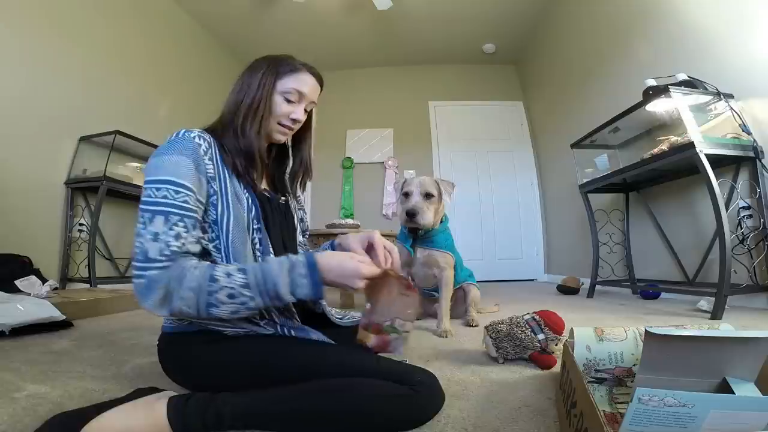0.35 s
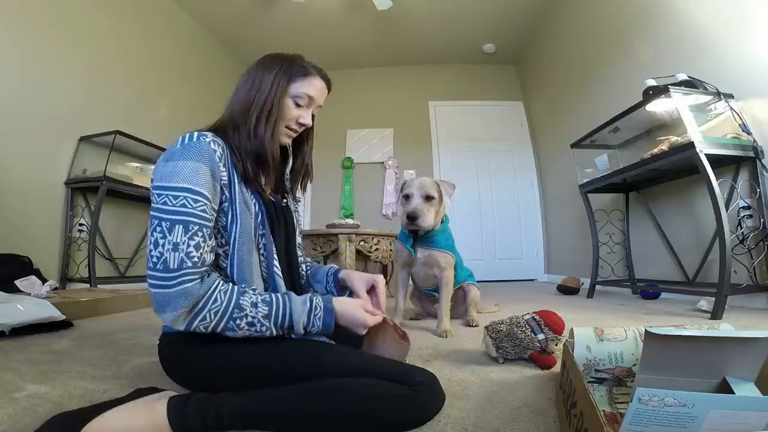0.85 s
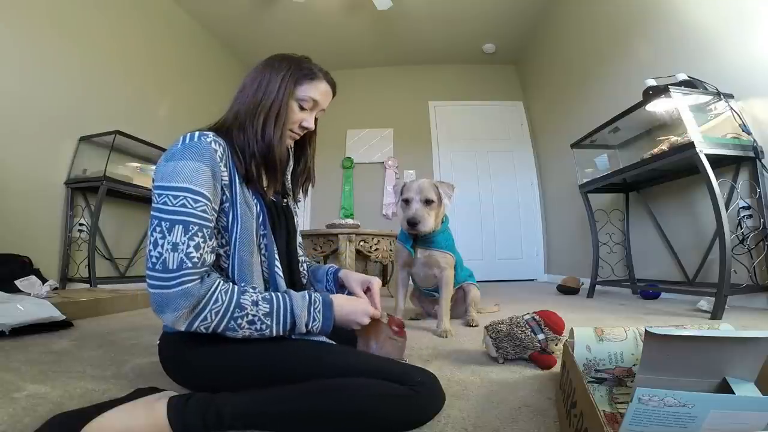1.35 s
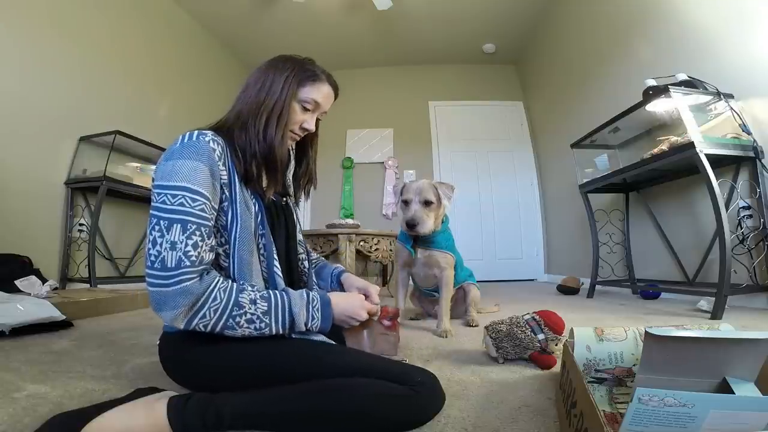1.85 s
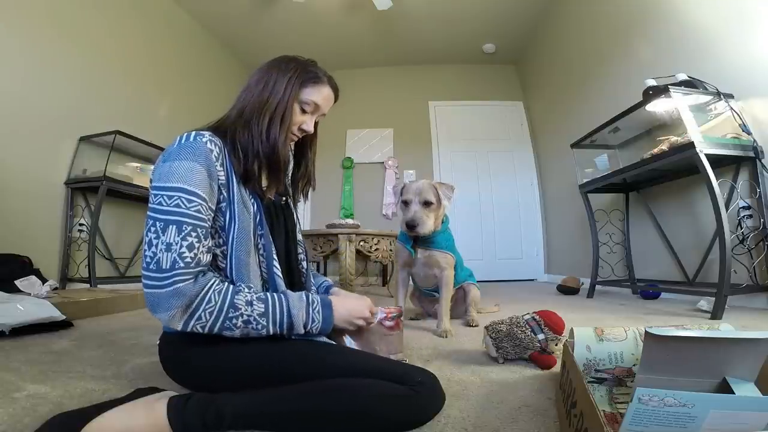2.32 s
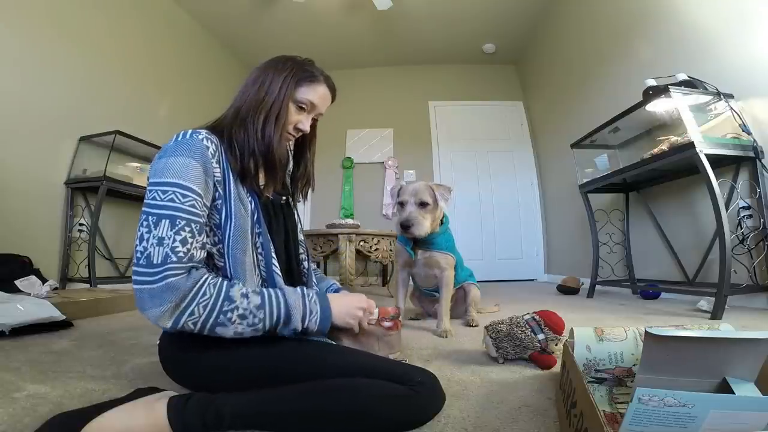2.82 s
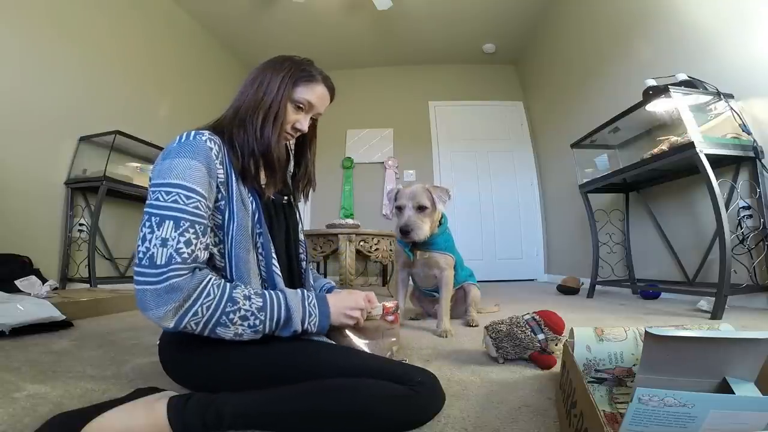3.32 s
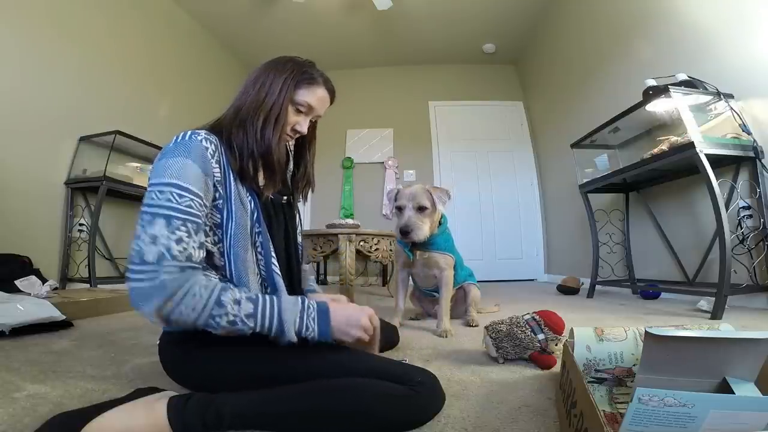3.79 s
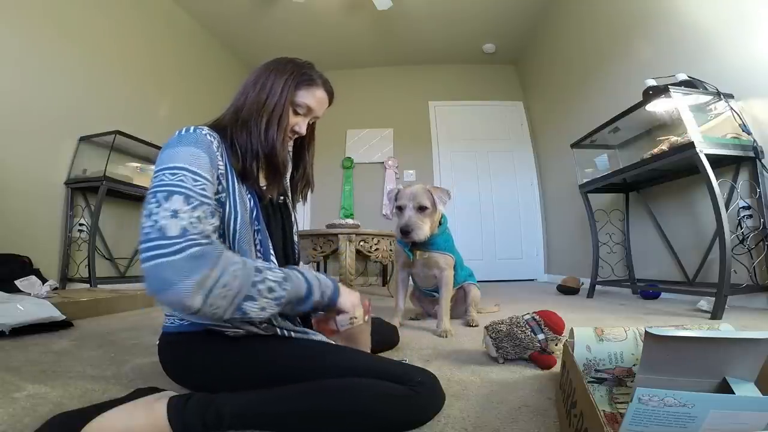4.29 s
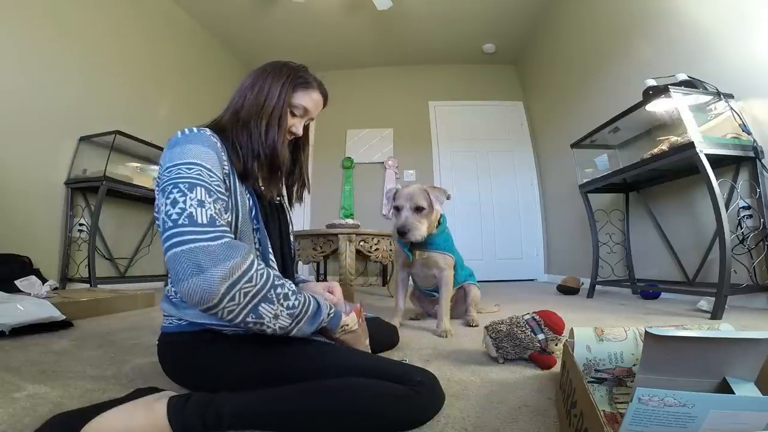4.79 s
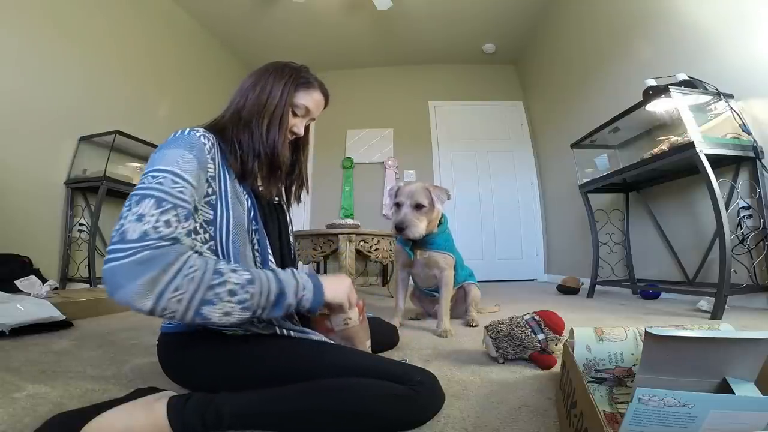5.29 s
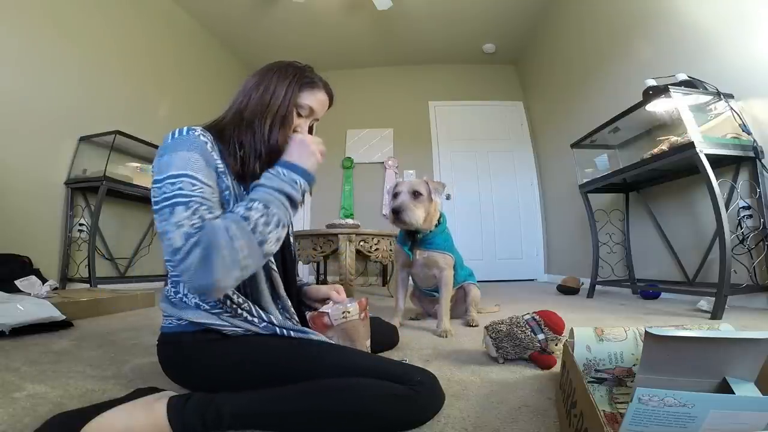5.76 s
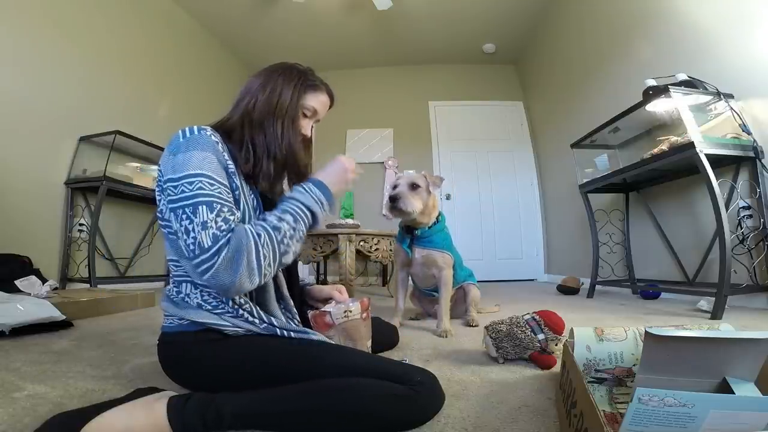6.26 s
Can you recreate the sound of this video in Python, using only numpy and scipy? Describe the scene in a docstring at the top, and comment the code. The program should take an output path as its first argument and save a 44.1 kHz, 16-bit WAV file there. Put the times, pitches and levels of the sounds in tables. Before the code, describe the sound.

Crackly plastic bag crinkling up close, sharp snaps and fine rustle in uneven flurries, over a faint low appliance hum indoors.

```python
"""A stiff plastic pouch is handled near the carpet of a small quiet room, an appliance humming faintly throughout.
Creases in the film snap over one by one, each with a pitch of its own, over a finer crackle: a quick burst
in the first 0.7 s, a lull, a few snaps around 1.5 s, then busier handling from 2.1 s. The densest, loudest
squeeze comes at 3.75 s and another flurry at 4.4 s; the snaps thin out and end near 6 s.
Panels and walls are decaying sines, the crackle rings random clicks; floor, walls and ceiling answer."""
import sys
import numpy as np
from scipy import signal
from scipy.fft import rfft, irfft
from scipy.io import wavfile

SR = 44100
rng = np.random.default_rng(int(sys.argv[2]) if len(sys.argv) > 2 else 0)


def voltage_ratio(level):
    """Linear amplitude factor for a level in decibels (scalar or array-like)."""
    return 10 ** (np.asarray(level, float) / 20)


def inscribe(sig):
    """Save sig as 16-bit PCM at rate SR to the path in sys.argv[1].

    A 1-D sig is mono; a 2-D sig holds one channel per row.
    Samples are clipped to [-1, 1] before scaling.
    """
    pcm = np.round(np.clip(np.atleast_2d(sig).T, -1, 1) * 32767)
    wavfile.write(sys.argv[1], SR, pcm.astype(np.int16))


N = 281446


def rms_one(x):
    """Scale to rms 1."""
    return x / np.sqrt(np.mean(x ** 2) + 1e-20)


def at_hz(points, hz, column=1):
    """Read a table on a log-frequency axis."""
    table = np.array(points)
    return np.interp(np.log(hz), np.log(table[:, 0]), table[:, column])


def filtered(x, hz, kind="low", order=2):
    """Butterworth filter: gentle roll-off beyond the corner frequency."""
    return signal.sosfilt(signal.butter(order, hz, kind, fs=SR, output="sos"), x)


# colour of the steady air and preamplifier noise: pitch_hz, relative level_db (per Hz)
ROOM_TONE = [(15, -27), (25, -4), (135, -8.5), (167, -14.5), (257, -15.5), (373, -26.5), (790, -22),
             (1210, -26), (2070, -29), (3180, -32.5), (15000, -44)]
ROOM_TONE_DB = -58  # rms


def room_tone():
    """Steady air and preamplifier noise: white noise coloured in the spectrum."""
    hz = np.maximum(np.fft.rfftfreq(N, 1 / SR), 1)
    spectrum = rfft(rng.standard_normal(N)) * voltage_ratio(at_hz(ROOM_TONE, hz))
    return voltage_ratio(ROOM_TONE_DB) * rms_one(irfft(spectrum, N))


# tones of the appliance: pitch_hz, level_db (rms, before the waver), waver_hz (new random values per second)
HUM = [(116, -59, 12), (85.8, -64.5, 6.5)]


def hum():
    """Low appliance tones whose strength and phase waver a little."""
    out, t = 0, np.arange(N) / SR
    for hz, level_db, waver_hz in HUM:
        steps = rng.standard_normal(200)
        waver = np.interp(t * waver_hz, np.arange(len(steps)), steps)
        tone = np.sin(2 * np.pi * hz * t + .7 * waver)
        out = out + np.sqrt(2) * voltage_ratio(level_db + .8 * waver) * tone
    return out


# squeezes of the fingers: start_s, hold_s (counted from the start), crackle_db (fine crackle),
# dull_db (tilt towards low pitches, per two octaves), rumble_db (bag walls)
SQUEEZES = [(0.0, 0.005, -51, 1, -60), (0.132, 0.033, -44.5, -6.5, -58), (0.242, .16, -52, -5, -57),
            (0.509, 0.082, -57, 8, -60), (0.598, 0.11, -56, -5.5, -68), (1.47, 0.059, -55, 1.5, -60),
            (1.618, 0.037, -48.5, -7.5, -51.5), (1.771, .03, -58, 10, -53), (2.084, 0.096, -49.5, -4, -59),
            (2.196, .05, -60, 12, -74), (2.307, 0.24, -56.5, 4, -58.5), (2.685, 0.054, -57, -2, -55),
            (2.793, 0.12, -53.5, 6.5, -59.5), (3.108, 0.059, -57, 11.5, -50.5),
            (3.207, 0.11, -56.5, 8.5, -56.5), (3.44, 0.034, -53, -2, -62), (3.625, 0.031, -48.5, -6, -76),
            (3.753, 0.094, -31, -7.5, -39.5), (3.96, 0.071, -44.5, 9.5, -56), (4.264, 0.081, -56.5, 1, -62),
            (4.318, 0.084, -47, -1, -49), (4.404, 0.043, -35.5, 0.5, -52), (4.445, 0.087, -46.5, 3, -44.5),
            (4.695, 0.083, -57, 5, -56.5), (4.86, 0.065, -54, 4, -59), (5.044, 0.061, -55.5, 1, -61),
            (5.117, 0.025, -45, -5, -52), (5.178, 0.045, -47, 1.5, -54), (5.265, 0.093, -59, 1, -60),
            (5.346, 0.037, -54.5, -3, -62), (5.407, 0.01, -51, 3.5, -51.5), (5.815, 0.018, -61.5, 11, -68)]
SQUEEZE_ATTACK_S, ATTACK_SHARE_OF_HOLD = 0.0031, 0.14  # long squeezes build slowly
SQUEEZE_RELEASE_DB_PER_S, RUMBLE_RELEASE_DB_PER_S = 159, 99
# the pouch merely held
HELD_CRACKLE_DB, HELD_DULL_DB, HELD_RUMBLE_DB = -70.5, 1.5, -66.5


def handling():
    """Squeezes swell, hold and let go; returns crackle dB, dullness dB and rumble dB in time."""
    t = np.arange(0, N + 64, 64) / SR
    start, hold, crackle_db, dull_db, rumble_db = np.array(SQUEEZES).T[:, :, None]
    swell = np.clip((t - start) / (SQUEEZE_ATTACK_S + ATTACK_SHARE_OF_HOLD * hold), 0, 1)
    after = np.maximum(t - start - hold, 0)
    # powers, so that overlapping squeezes add
    fine = (swell * voltage_ratio(crackle_db - SQUEEZE_RELEASE_DB_PER_S * after)) ** 2
    low = (swell * voltage_ratio(rumble_db - RUMBLE_RELEASE_DB_PER_S * after)) ** 2
    held = voltage_ratio(HELD_CRACKLE_DB) ** 2
    total = fine.sum(axis=0) + held
    # the strongest squeeze of the moment weighs most in the dullness
    dull = ((fine * dull_db).sum(axis=0) + held * HELD_DULL_DB) / total
    rumble = low.sum(axis=0) + voltage_ratio(HELD_RUMBLE_DB) ** 2
    curves = (10 * np.log10(total), dull, 10 * np.log10(rumble))
    return [np.interp(np.arange(N) / SR, t, curve) for curve in curves]


def ring(clicks, hz, t60):
    """A unit click sets a sine of height 1 ringing; it falls 60 dB in t60 seconds."""
    r, w = voltage_ratio(-60 / (t60 * SR)), 2 * np.pi * hz / SR
    return signal.lfilter([0, np.sin(w)], [1, -2 * r * np.cos(w), r * r], clicks + 1e-18)


def grains(per_s, spread_db, pitches, cycles):
    """Random clumped clicks, dealt to resonators; rms 1 each."""
    clumps = np.repeat(rng.standard_normal(N // 256 + 1), 256)[:N]
    born = rng.random(N) < per_s * voltage_ratio(4.0 * clumps) / SR
    sizes = voltage_ratio(spread_db * np.minimum(rng.exponential(1, N), 4)) * rng.choice([-1, 1], N)
    dealt = rng.integers(0, len(pitches), N)
    return [rms_one(ring(sizes * born * (dealt == k), hz, cycles / hz)) for k, hz in enumerate(pitches)]


# colour of the fine crackle of the film: pitch_hz, relative level_db
FILM = [(600, 8), (1000, -8.5), (1500, 3), (2400, -5), (4100, -4.5), (6000, -4), (9000, -34), (15000, -19)]
# typical rates, which the clumps raise and lower
CRACKLE_PER_S, CRACKLE_SPREAD_DB = 2200, 2.5
RUMBLE_PER_S, RUMBLE_HZ = 400, (235, 290, 345, 428, 580)


def crackle():
    """Small creases give way all the time; the large walls of the bag flex and rumble."""
    level_db, dull_db, rumble_db = handling()
    pitches, fine = np.geomspace(700, 14000, num=14), 0
    for hz, grain in zip(pitches, grains(CRACKLE_PER_S, CRACKLE_SPREAD_DB, pitches, cycles=5.0)):
        # a duller grip favours the large slow creases
        tilt_db = dull_db * np.log2(2500 / hz) / 2
        # the bands widen with pitch, and their level with them
        width_db = 10 * np.log10(hz / 1800)
        fine = fine + grain * voltage_ratio(at_hz(FILM, hz) + width_db + tilt_db)
    fine = filtered(fine, 600, "high")
    rumble = sum(grains(RUMBLE_PER_S, 2.2, RUMBLE_HZ, cycles=4.0))
    rumble = rms_one(filtered(rumble, 700))
    return rms_one(fine) * voltage_ratio(level_db) + rumble * voltage_ratio(rumble_db)


def flip(hz, cycles, t):
    """A sine that swells within half a turn and dies, losing 60 dB in the given cycles."""
    turns = hz * t
    swell = (1 - np.exp(-turns / .3)) ** 2
    return 2 * np.sin(2 * np.pi * turns) * swell * voltage_ratio(-60 * (turns - .5) / cycles)


# small creases that snap by chance; OVER is the peak above the crackle, give or take SPREAD
SMALL_SNAPS, SMALL_OVER_DB, SMALL_SPREAD_DB = 60, 9.5, 6
SMALL_HZ, SMALL_MOUTH_DB, SMALL_TICK_DB = (1900, 4500), -3, -10  # mouth and tick: middle of a 20 dB range


def small_snaps():
    """Rows like those of the louder creases, at random moments, as strong as the squeeze of the moment."""
    when, size, pitch, mouth, tick = rng.random((SMALL_SNAPS, 5)).T
    crackle_db = handling()[0][(when * N).astype(int)]
    peak_db = crackle_db + SMALL_OVER_DB + SMALL_SPREAD_DB * 2 * (size - .5)
    # squaring favours the low pitches
    hz = SMALL_HZ[0] * (SMALL_HZ[1] / SMALL_HZ[0]) ** (pitch ** 2)
    mouth_db = SMALL_MOUTH_DB + 20 * (mouth - .5)
    tick_db = SMALL_TICK_DB + 20 * (tick - .5)
    return np.transpose([when * N / SR, peak_db, hz, mouth_db, tick_db])


# the louder creases snapping over: start_s, level_db (panel peak, before the room), pitch_hz (panel),
# mouth_db (puff through the pouch mouth, relative to the panel), tick_db (relative to the panel)
SNAPS = [(0.075, -22, 3420, -18.5, -35), (0.131, -9.5, 5860, -17.5, 1.5), (0.1338, -17, 3740, -8.5, -12),
         (0.145, -31.5, 5140, -23, 15), (0.2507, -14.5, 2580, -9.5, -12), (0.3158, -8, 6240, -21, -2),
         (0.3467, -5.5, 4380, -33.5, 0.5), (0.5238, -46, 1920, -4, -17), (0.5319, -38.5, 3230, -1, -17),
         (0.5969, -40.5, 3180, 3, -10), (0.6202, -25, 4360, -18.5, -5), (0.6729, -28, 2680, -10.5, -34),
         (1.335, -42.5, 3640, -3, 0), (1.4112, -38, 5300, -24, -2), (1.4737, -20, 4000, -14.5, 1.5),
         (1.6246, -33.5, 2700, 3.5, -21), (1.6297, -18, 4100, -18, -0.5), (1.7729, -29.5, 2200, -0.5, -15),
         (1.787, -38.5, 2020, -3, -8), (2.0672, -29, 3620, -5, -25), (2.0802, -16.5, 5130, -13.5, -42),
         (2.1221, -47, 2450, -10, -19), (2.127, -23.5, 1970, -10, -2), (2.1314, -19.5, 4500, -9, -16),
         (2.1555, -13, 5200, -15.5, -2.5), (2.1635, -25.5, 3680, -7, 3), (2.2144, -40.5, 1910, 5.5, -10),
         (2.2497, -31.5, 2150, -12, -23), (2.2837, -38, 1890, -8, -17), (2.3307, -37.5, 4340, 0, -14),
         (2.3567, -30, 2120, -9.5, -14), (2.3988, -33, 6160, -8, -18), (2.4104, -32.5, 2750, -3, -4),
         (2.45, -28.5, 2570, -8, -10), (2.4629, -37, 1913, -4, -3), (2.5114, -29, 3500, -2.5, -25),
         (2.5165, -27, 2650, -20, -13), (2.54, -27, 4140, -28, -5), (2.7055, -24, 6030, -14.5, -28),
         (2.7305, -31, 1890, -6, -9), (2.74, -30.5, 3510, -20, -4), (2.8128, -28, 2030, 0.5, 0),
         (2.8391, -38, 1910, 4.5, -22), (2.856, -21.5, 5040, -12, -10), (2.8651, -27, 1980, -3.5, -13),
         (2.961, -40.5, 2100, -14, -1), (3.042, -45.5, 2100, 5, -1), (3.1245, -38.5, 2100, 4, -9),
         (3.1457, -31, 3500, 0.5, -2), (3.2119, -15.5, 4310, -13.5, -4.5), (3.2395, -25.5, 2410, -9, 1.5),
         (3.3295, -22, 1910, -8, 0), (3.361, -11.5, 4940, -17, -0.5), (3.3766, -27.5, 7900, -11, 8.5),
         (3.3897, -22.5, 1930, -35, 2), (3.452, -27.5, 2580, -3.5, -8), (3.6245, -19, 2206, -8.5, -5),
         (3.675, -25.5, 1840, -13, -1.5), (3.7572, -11.5, 4260, -25, -35), (3.7721, -9.5, 4330, -10, -1),
         (3.7816, -6.5, 3900, -18, -11), (3.7937, -8, 1910, -25, -5), (3.8034, -20, 2180, -2, 1),
         (3.8052, -7.5, 3260, -3, -1), (3.8243, -15.5, 2200, -19, -12), (3.8315, -17.5, 1970, 8.5, -26),
         (3.845, -6.5, 1910, -25, -6), (3.8576, -20.5, 2000, 5.5, 1), (3.8602, -8.5, 4000, -17, -0.5),
         (3.8872, -20, 3040, -1, -10), (3.9252, -35, 1920, 8, -22), (3.9641, -35.5, 2000, 7.5, -15),
         (3.9822, -26.5, 2090, -13, -14), (3.9977, -34, 1990, 3, -6), (4.0039, -19.5, 2860, 0, -7),
         (4.048, -27, 3920, -14, -29), (4.3197, -33, 2910, 2.5, -5), (4.3479, -28, 2612, -3, -2),
         (4.4148, -24.5, 2563, 3, -20), (4.4168, -30.5, 2870, -4.5, -18), (4.4355, -13.5, 2580, -6, -14),
         (4.448, -13.5, 2470, -29, -3.5), (4.475, -32, 2620, -15, -13), (4.4911, -38, 3040, -12, -25),
         (4.5155, -33, 3860, -7, -22), (4.5234, -23.5, 2850, -15, -23), (4.5408, -28.5, 1900, -5, -18),
         (4.5544, -27.5, 2000, -3.5, -27), (4.624, -38, 2630, -15, -20), (4.715, -46.5, 4640, 9, -28),
         (4.7421, -25, 3600, -7, -35), (4.8425, -49.5, 1890, 2, -18), (4.8531, -42, 2970, -10, -20),
         (4.8783, -33, 2830, -7, -17), (4.9067, -21, 2870, -12, -4), (5.054, -32.5, 5300, -8.5, -22),
         (5.1231, -28.5, 2750, -5.5, -15), (5.1332, -27.5, 1936, -3, -2), (5.1471, -32, 2750, -1, -10),
         (5.1739, -40.5, 1970, 11, -12), (5.195, -25, 2830, -3, -36), (5.3818, -40, 1930, 1, 6),
         (5.3966, -40.5, 3930, -4, -7), (5.4296, -38, 2230, -10, -20), (5.4433, -29, 2100, -19, -22),
         (5.8153, -34.5, 2000, -3.5, -36), (5.976, -58, 1940, 10, -23)]
# air and walls of the pouch, set ringing by every snap: pitch_hz, relative level_db, t60_s
POUCH = [(184, -11, 0.21), (353, 5, 0.02), (532, 6, 0.015), (840, -24.5, 0.0012)]
PANEL_CYCLES, TICK_HZ, TICK_TOP_HZ = 3.13, 4900, 11130
MOUTH_HZ, MOUTH_CYCLES = 1500, 5.5  # middle pitch of the opening
# the knock on the pouch follows the puff: share of the puff's relative level, offset
THUMP_FOLLOWS, THUMP_DB = 0.77, -13.5


def snaps():
    """Each crease flips a small panel, puffs air through the mouth, ticks, and knocks the pouch."""
    start, peak_db, hz, mouth_db, tick_db = np.vstack([SNAPS, small_snaps()]).T[:, :, None]
    thump_db = THUMP_FOLLOWS * mouth_db + THUMP_DB
    at = np.floor(start * SR).astype(int)
    chance = rng.standard_normal((len(start), 8))
    t = np.arange(600) / SR
    panel = flip(hz, PANEL_CYCLES, t)
    # the opening changes shape with the grip, and its pitch with it
    mouth = voltage_ratio(mouth_db) * flip(MOUTH_HZ * voltage_ratio(1.4 * chance[:, :1]), MOUTH_CYCLES, t)
    # the crease itself cracks: a bare click, treble only
    tick = voltage_ratio(tick_db) * filtered(3.31 * (t == 0), [TICK_HZ, TICK_TOP_HZ], "band")
    # a panel flips inwards or outwards
    push = np.sign(chance[:, 2:3]) * voltage_ratio(peak_db)
    out = np.zeros(N + len(t))
    np.add.at(out, at + np.arange(len(t)), push * (panel + mouth + tick))
    knocks = 0
    for k, (mode_hz, mode_db, t60) in enumerate(POUCH):
        blows = np.zeros(N)
        # every blow lands a little differently on each mode
        blows[at[:, 0]] = (push * voltage_ratio(thump_db))[:, 0] * voltage_ratio(mode_db + 3.0 * chance[:, 3 + k])
        knocks = knocks + ring(blows, mode_hz, t60)
    # the knock is soft
    return out[:N] + filtered(knocks, 900)


# first reflections: delay_s, level_db, smear_s (fall to 1/e)
ECHOES = [(.001, -4.5, 0.0011), (.0045, -8, 0.00097), (.0078, -18, 0.00073), (0.0145, -12, 0.00075),
          (0.019, -14, 0.0015), (0.025, -19, 0.0057)]
# diffuse tail of the room: pitch_hz, t60_s, level_db
TAIL = [(233, 0.48, 3.5), (500, 0.23, 5.5), (1040, 0.41, -1), (2000, 0.28, 3.5), (3960, 0.34, 3.5),
        (7660, 0.26, 3.5), (12300, 0.24, -0.5)]
TAIL_RISE_S = 0.0025


def reflections():
    """A few smeared early reflections, then a noise tail that dies band by band."""
    t = np.arange(SR // 2) / SR
    response, white = np.zeros(len(t)), rng.standard_normal((2, len(t)))
    for delay, level_db, smear in ECHOES:
        burst = white[0] * np.exp(-np.maximum(t - delay, 0) / smear) * (t >= delay)
        response += voltage_ratio(level_db) * burst / np.sqrt(np.sum(burst ** 2))
    edges = 100 * 2 ** np.arange(0, 7.6, .5)  # half octaves
    for low, high in zip(edges, edges[1:]):
        hz = np.sqrt(low * high)
        band = filtered(white[1], [low, high], "band")
        shape = voltage_ratio(-60 * t / at_hz(TAIL, hz)) * (1 - np.exp(-t / TAIL_RISE_S))
        response += voltage_ratio(at_hz(TAIL, hz, column=2)) * band * shape / np.sqrt(np.sum(shape ** 2))
    return response


# hands shade the direct treble: above SHADOW_HZ only a share of SHADOW_DB gets by
SHADOW_HZ, SHADOW_DB = 7300, -24
PLACES, PLACE_S = 6, .05  # places taken in turn, and the stay at each


def room(dry):
    """The sound leaves the pouch from places in turn, each with its own paths through the room."""
    place = (np.arange(N) / SR / PLACE_S).astype(int) % PLACES
    wet = sum(signal.fftconvolve(dry * (place == k), reflections())[:N] for k in range(PLACES))
    shaded = filtered(dry, SHADOW_HZ, order=6)
    return shaded + voltage_ratio(SHADOW_DB) * dry + wet


RADIATES_ABOVE_HZ = 152


def scene():
    """Pouch in the room, over the quiet background."""
    # a small object radiates no deep bass
    pouch = filtered(snaps() + crackle(), RADIATES_ABOVE_HZ, "high")
    return (room(pouch) + room_tone() + hum())[None]


def low_pass(x):
    """Removes everything above the highest recorded frequency."""
    return signal.sosfilt(signal.butter(12, 16510, fs=SR, output="sos"), x)


SOFT_HZ = 11650  # the microphone's treble softens above
TOP_HZ = 15500  # nearly nothing is heard beyond


def record(dry):
    """A small microphone whose treble rolls off gently; the finished mix also ends steeply at the top."""
    soft = filtered(dry, SOFT_HZ)
    # a steep low-pass: the stop band, 35 dB down, begins just above the top
    cut = signal.sosfilt(signal.cheby2(10, 35, TOP_HZ + 300, fs=SR, output="sos"), soft)
    return low_pass(cut)


dry = scene()
out = record(dry)
inscribe(out)
```